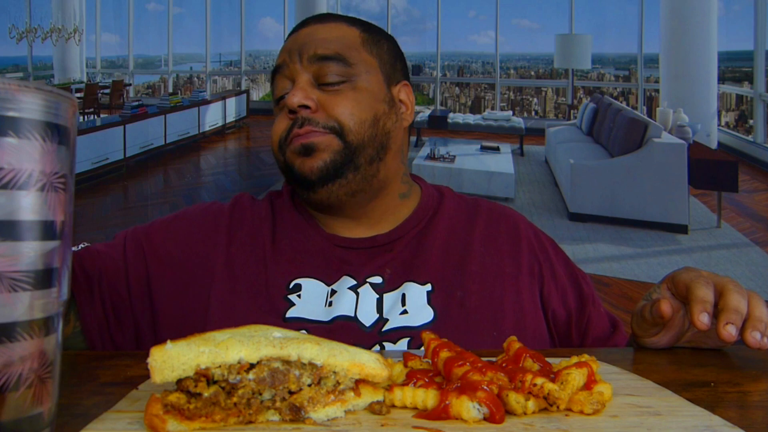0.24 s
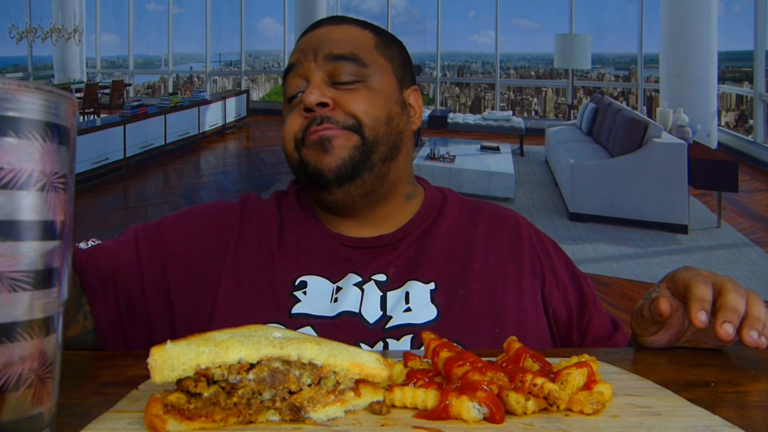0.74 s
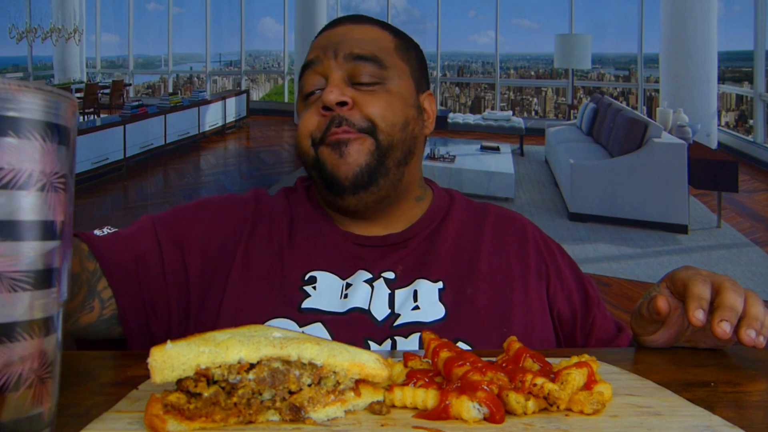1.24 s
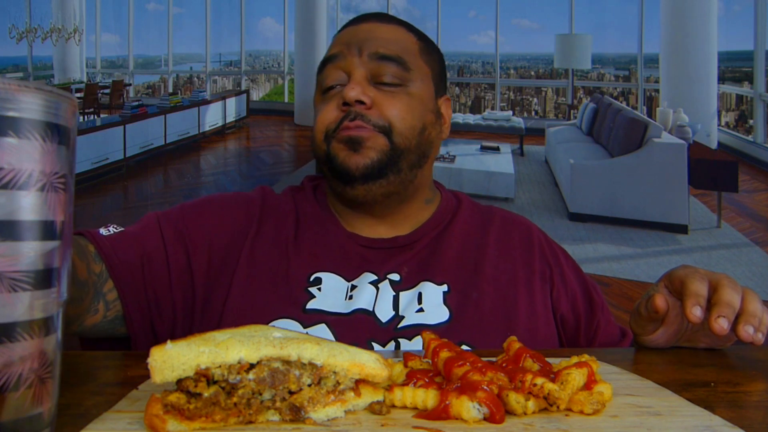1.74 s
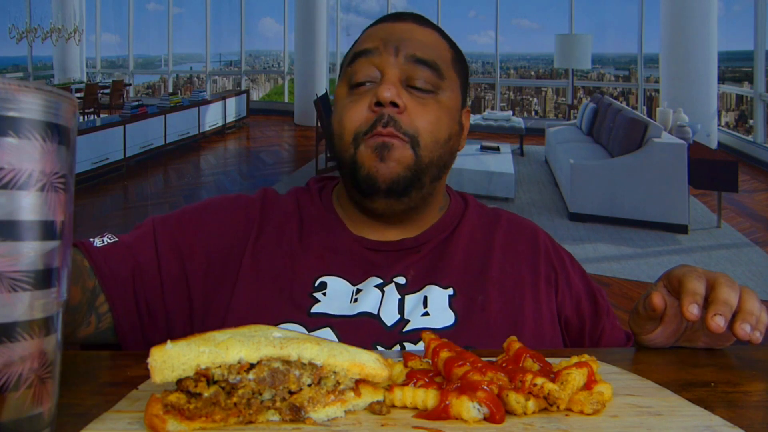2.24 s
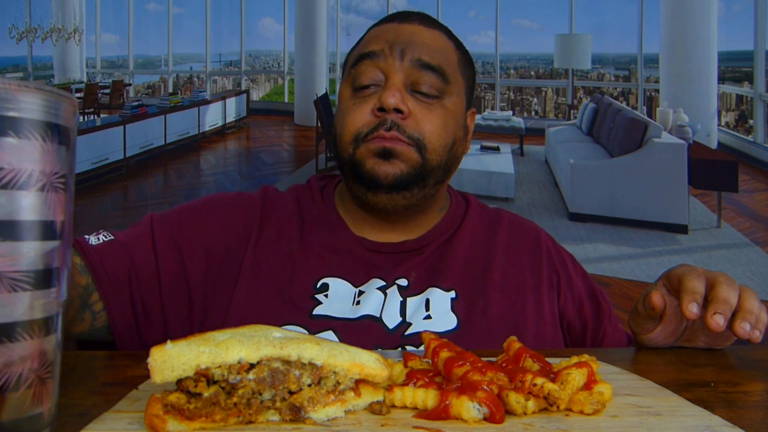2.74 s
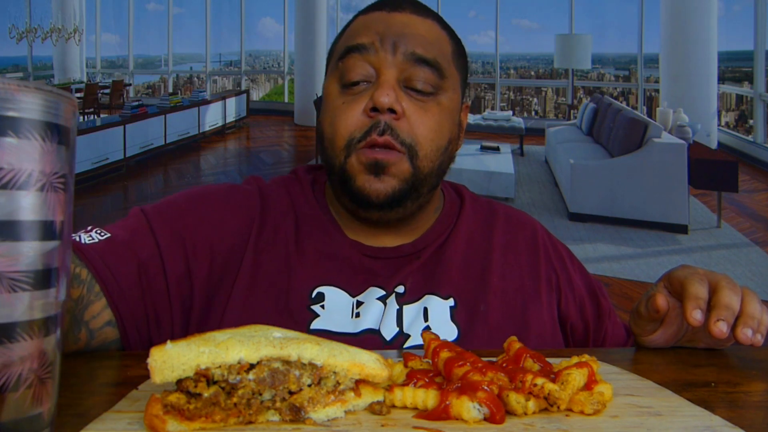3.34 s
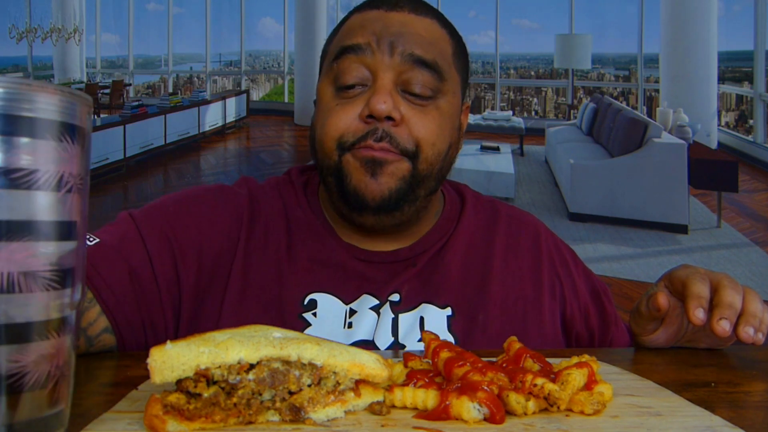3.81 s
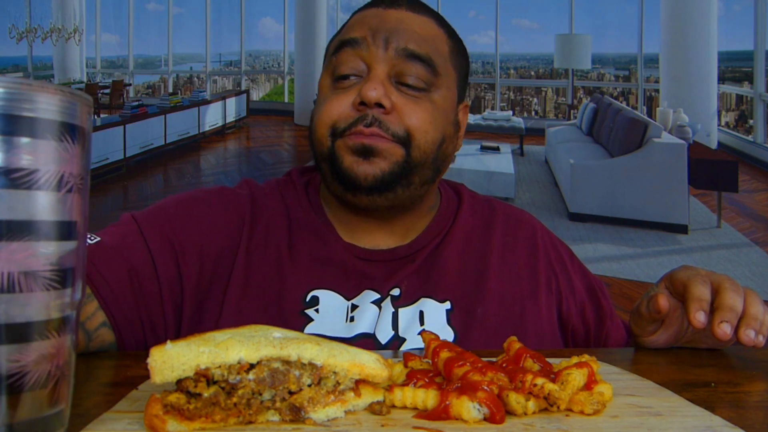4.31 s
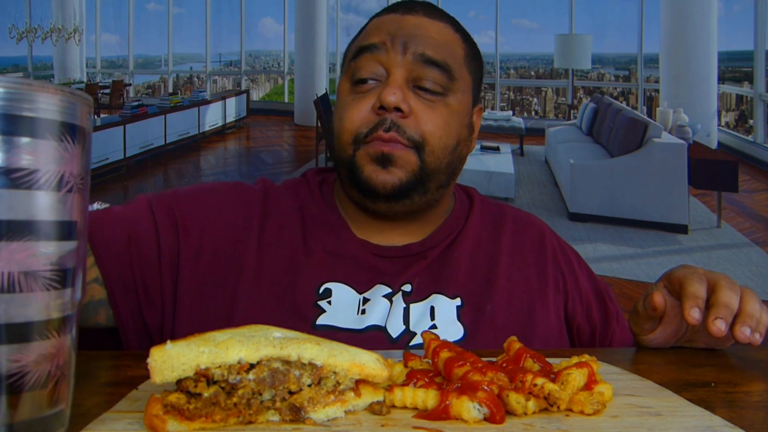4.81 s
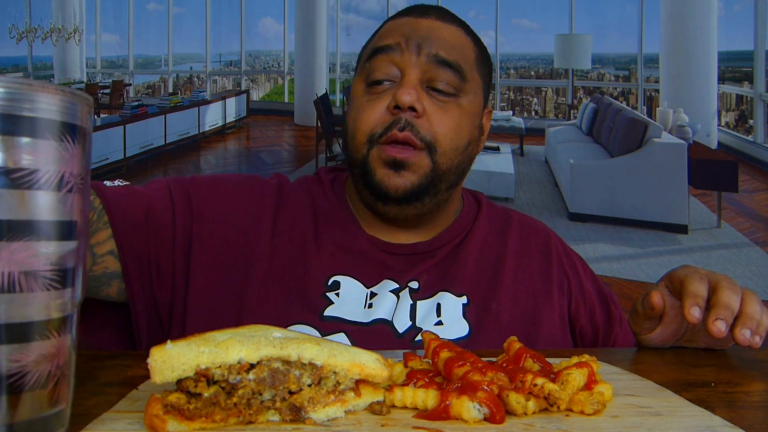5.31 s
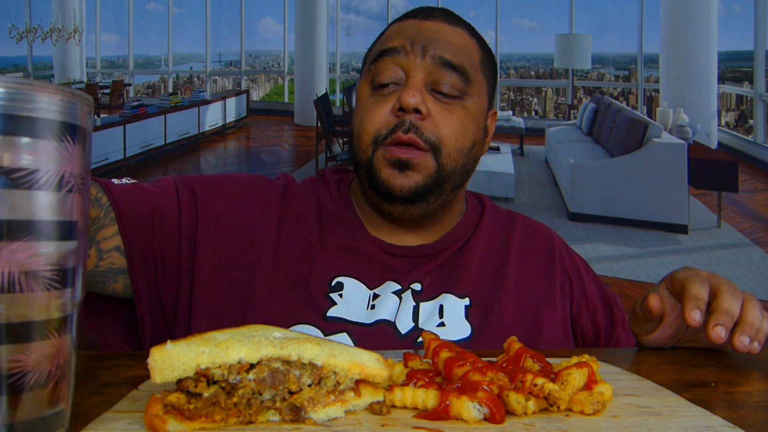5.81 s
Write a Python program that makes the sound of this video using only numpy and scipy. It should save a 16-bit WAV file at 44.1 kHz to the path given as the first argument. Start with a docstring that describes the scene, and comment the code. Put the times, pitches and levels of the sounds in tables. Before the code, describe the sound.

A drink can shuffles lightly on a wooden table. Its tab cracks the seal with a brief spit of gas, and the lid tears open in loud, sharp snaps. After a few smaller clicks, the can is dragged with a squeaky scrape and some knocks. A plastic tumbler is tapped, then soda pours in softly, bubbling and crackling. The sounds are close and slightly left in a small room with a faint hum.

```python
"""A drink can is opened: the tab cracks the seal, gas spits out and the thin lid tears in three snaps.
Before that, the can shuffles on a wooden table, its rim slipping in tiny jerks. Afterwards the tab
clicks back, the can is dragged, a plastic tumbler is nudged and tapped, and soda pours into it, a
cloud of ringing bubbles under crackling foam. A small live room with a faint hum surrounds it all."""
import sys
import numpy as np
from scipy import signal
from scipy.fft import rfft, irfft, next_fast_len
from scipy.io import wavfile
from scipy.ndimage import uniform_filter1d

SR = 44100
rng = np.random.default_rng(int(sys.argv[2]) if len(sys.argv) > 2 else 0)


def waveform_to_disk(signal):
    """Save audio, clipped to [-1, 1], as 16-bit WAV at the path in sys.argv[1]."""
    frames = np.transpose(np.atleast_2d(signal))
    scaled = np.clip(frames, -1, 1) * 32767
    samples = np.round(scaled).astype(np.int16)
    wavfile.write(sys.argv[1], SR, samples)


N = 267246

# Tone curves for the noisy layers. Each row: frequency in Hz, relative spectral level in dB.
AIR_TONE = [(15, -38.5), (25, -12), (48, -20), (119, -15.5), (204, -7), (233, -12), (289, -13.5),
            (445, -15.5), (848, -12), (1900, -25), (3720, -31.5), (4620, -33), (6210, -26), (15500, -40.5)]
FIZZ_TONE = [(1100, -14), (1500, -3), (2290, -6), (3890, -8), (4460, -9.5), (4950, -7), (5780, -10.5),
             (8020, -4), (15000, -29)]
POUR_TONE = [(210, -46.5), (350, -10), (607, -1), (780, -11), (871, -21), (942, -8.5), (1530, -2.5),
             (2270, -6.5), (3640, -14.5), (4130, -9), (5150, -9), (8380, -5), (11000, -13), (15000, -23)]
SHUFFLE_TONE = [(71, -61.5), (120, -30), (170, -24), (230, -9.5), (300, -11.5), (456, -10.5), (493, -8.5),
                (665, -12.5), (812, -6.5), (1000, -13), (1210, -14.5), (1420, -12), (1950, -18),
                (2200, -15.5), (2600, -14.5), (3400, -18.5), (6070, -19.5), (7550, -18), (14000, -46.5)]
SKID_TONE = [(88, -63), (150, -33), (215, -18.5), (387, -9), (426, -7.5), (672, -19.5), (860, -4.5),
             (1230, -9.5), (1310, -5.5), (1520, -30), (1610, -13), (2690, -25), (3130, -21.5),
             (7920, -28.5), (14000, -56)]
DRAG_TONE = [(71, -55), (120, -26), (200, -10.5), (318, -8.5), (400, -5), (530, -3.5), (690, -4),
             (790, -7.5), (952, -7.5), (1480, -6), (1900, -12), (2530, -17.5), (2900, -12), (3400, -19),
             (6310, -17.5), (9780, -31), (11500, -43.5), (14000, -85)]
NUDGE_TONE = [(88, -33.5), (150, -8), (210, -18), (341, -11.5), (524, -1.5), (776, -12), (935, -13),
              (1050, -14.5), (1380, -12), (1900, -23), (6890, -20), (13000, -44)]
GAS_TONE = [(200, -61.5), (700, -41), (1300, -22), (2100, -20.5), (2900, -28), (4100, -11.5), (4700, -3.5),
            (5500, -5.5), (8000, -1.5), (10000, -8.5), (12500, -17), (15000, -25), (16000, -54)]
TEAR_TONE = [(530, -55), (900, -19), (1450, -8), (1860, -5.5), (2300, -12), (2750, -15), (3150, -15),
             (3930, -9.5), (4400, -17), (5690, -2), (6800, -11), (8310, -6), (10600, -28.5), (13000, -35)]
# Appliance hum. Each row: frequency in Hz, relative level in dB.
HUM_PARTIALS = [(118.4, -70.5), (166.9, -76)]
# The room's tail. Each row: frequency in Hz, time to fall 60 dB in seconds.
ROOM_DECAY = [(200, .4), (600, .36), (1300, 0.37), (4000, 0.36), (8000, 0.37), (14000, 0.17)]
# Early reflections. Each row: delay in seconds, relative level in dB.
REFLECTIONS = [(.0053, -14.5), (.0088, -21.5), (0.0106, -15.5)]
# The loudest splashes in the tumbler. Each row: start in seconds, relative level in dB, bubble pitch
# in Hz, decay time in cycles, spray level against the bubble in dB.
SPLASHES = [(5.1367, -42, 4620, 8, -23.5), (5.1554, -42, 6860, 6, -8), (5.3217, -43.5, 2726, 4.5, -4.5),
            (5.4453, -41, 6700, 10, -18), (5.47, -42, 5760, 10, -21), (5.5772, -36, 4370, 16, -18),
            (5.595, -41, 4800, 14, -13), (5.628, -41, 6600, 5, -14), (5.6371, -34, 1950, 6.4, -14),
            (5.6491, -35.5, 2240, 8.7, -7), (5.6883, -39, 5835, 13, -11), (5.699, -39.5, 2740, 7, -16),
            (5.711, -39.5, 2519, 9.8, -20), (5.7533, -42, 4190, 8, -15), (5.7613, -37, 5850, 10, -18),
            (5.7867, -32.5, 4030, 13.5, -14), (5.806, -37.5, 8350, 8, -8), (5.8174, -36, 8020, 14, -6.5),
            (5.853, -46.5, 4048, 18, -15), (5.9135, -44.5, 1970, 8, -8), (5.9848, -35.5, 6200, 12, -13),
            (5.999, -37.5, 6400, 14, -9), (6.014, -43, 1814, 9.5, -4), (6.0362, -34, 4640, 10, -15),
            (6.043, -31.5, 4170, 16, -14)]
# The thin stream sounds a resonance of the vessel. Each row: time in seconds, pitch in Hz, level in dB.
VESSEL_RING = [(5.15, 1630, -78), (5.18, 1610, -69.5), (5.3, 1600, -69.5), (5.45, 1542, -62.5),
               (5.62, 1510, -62), (5.73, 1510, -69), (5.81, 1523, -61), (5.86, 1540, -80)]
# A fingertip rubs the can with a thin whistle. Each row: time in seconds, pitch in Hz, level in dB.
FINGER_RUB = [(.6, 7000, -80), (.67, 7010, -53), (.75, 6750, -57), (.78, 7170, -58.5), (.865, 6780, -54),
              (.915, 6720, -61), (.97, 6640, -53.5), (1.07, 6820, -56), (1.2, 7100, -79.5)]
# Resonances of a container on the table. Each row: frequency in Hz, width in Hz, boost in dB.
BODY_MODES = [(222, 18, 7), (320, 13, 4.5), (500, 45, 3.5), (689, 37, 3.5), (973.6, 16, 9), (1083, 14, 6),
              (1370, 98, 6), (1510, 40, 5), (1624, 14, 7), (2176, 60, 5), (2865, 42, 6), (3200, 36, 5.5),
              (4060, 160, 3)]
# Pushes across the table. Each row: manner, time of top speed, rise and fall in seconds, wall level
# in dB, then table rumble and grit in dB against the wall.
PUSHES = [("shuffle", .01, .05, 0.097, -46.5, -6.5, -5), ("shuffle", 0.16, 0.048, 0.047, -39.5, -6, -1.6),
          ("shuffle", 0.5247, .075, 0.044, -44.5, 1, 0.89),
          ("shuffle", 0.592, 0.051, 0.068, -49.5, 3.6, -3.5), ("shuffle", .77, 0.13, 0.31, -59, 8, 1),
          ("shuffle", 1.13, 0.15, .09, -45.5, 1.5, -4.5), ("shuffle", 1.24, 0.067, 0.036, -51, 1.5, -7),
          ("skid", 2.815, 0.043, 0.065, -38, -2.3, -10.5),
          ("skid", 2.905, 0.046, 0.051, -29.5, -10.5, -6.5), ("drag", 2.988, 0.0089, 0.12, -30, -4, -5.5),
          ("drag", 3.14, 0.09, 0.086, -32, -14, -8.5), ("drag", 3.235, 0.072, 0.076, -31.5, -10, -6),
          ("drag", 3.338, 0.077, 0.13, -36, -1.6, -7), ("nudge", 4.11, 0.097, 0.07, -49.5, 0.45, -6)]
# The rim catches and sings. Each row: start and length in seconds, pitch in Hz, level in dB.
SQUEALS = [(.155, 0.047, 1400, -41.5), (0.44, 0.12, 1380, -48), (.53, 0.17, 498.5, -37),
           (1.971, .05, 1400, -40), (2.19, .22, 950, -60), (2.77, 0.11, 1345, -43),
           (2.791, 0.15, 1008, -37.5), (2.861, 0.098, 1334, -27), (3.015, 0.099, 320, -26.5),
           (3.09, .08, 322, -36.5), (3.113, 0.1, 1620, -31.5), (3.2, 0.1, 1488, -29),
           (3.212, 0.11, 1345, -30.5), (3.24, 0.16, 973, -38), (3.21, 0.06, 7330, -45),
           (3.245, 0.06, 6520, -44)]
# Knocks on the table. Each row: start in seconds, relative thud level in dB, pitch in Hz, shove in dB.
KNOCKS = [(1.5025, -26.5, 700, -35), (1.53, -20, 950, -38), (2.983, -13.5, 260, -70),
          (2.995, -14, 292, -65), (3.01, -12.5, 990, -65), (3.026, -19, 510, -65), (3.043, -15, 315, -65),
          (3.058, -17, 317, -65), (4.442, -26.5, 700, -60), (4.448, -33, 930, -66)]
# The tab is worked and metal tears. Each row: peak time in seconds, low and bright band levels in dB.
TEARS = [(1.35, -30, -33), (1.471, -34, -20), (1.51, -34.5, -22.5), (1.538, -31, -28), (1.76, -50, -70),
         (1.968, -47.5, -56), (2.0, -53, -49.5), (2.159, -54, -46)]
# Modes of the lid. Each row: frequency in Hz, relative level in dB, time to fall 60 dB in seconds.
LID_MODES = [(1030, -8.5, .011), (1400, -9, .018), (1740, -14, 0.0041), (2200, -12, 0.011),
             (3024, -1, .013), (3250, -7, .0052), (4090, -3.5, .0085), (4958, -3.5, .007),
             (5530, -3, .0031), (7330, 7.5, .003), (8150, -5.5, .007), (9300, -9.5, 0.0095)]
# Snaps of lid and tab. Each row: start in seconds, relative level in dB, wall pitch in Hz, low, rim and
# bright bands in dB against the middle band, panel pitch in Hz, panel level in dB, top of ring in Hz.
SNAPS = [(0.4473, -43, 1400, -15, -7, 1, 6900, 6, 12000), (.4795, -37, 1400, -15, -9, 1, 5960, 6, 12000),
         (.5322, -30, 1400, -16, -17, 0, 5700, 20, 8640), (1.279, -4, 1500, -35, -31, -5, 4080, 14, 9500),
         (1.4635, -5, 1950, -14.5, -33, -4.5, 4140, 6, 8900),
         (1.4686, -18, 1900, -20, -20, 0, 5800, 19, 8800),
         (1.5019, 0, 2076, -13, -25, -11.5, 5200, 5, 11500),
         (1.5074, -10, 1600, -23, -18, -8, 5400, 19, 8800),
         (1.5295, -3.5, 1330, -2.5, -5, -3, 5400, 2.5, 11000),
         (1.8163, -16, 1160, 6, -12, -11.5, 4280, 3, 8200), (1.982, -44, 1413, 23.5, -3, 4, 4300, -3, 8500),
         (2.008, -49.5, 1490, 21, 1, 14, 4300, 0, 8000),
         (2.1625, -33.5, 2150, -13, -4, 11, 7460, 10.5, 9830),
         (2.167, -38.5, 2100, -11, -8, 10, 7500, 1, 9800),
         (2.5002, -27.5, 1450, -1.5, -9, 1.5, 4100, 6, 9700),
         (2.5056, -27, 1440, -14, -10, -2, 5960, 14, 11000),
         (2.5089, -32.5, 1450, -10, -6, 3.5, 8600, 0, 12020),
         (4.4345, -40.5, 1400, -6, -7, 5, 4350, 3, 11510)]

CENTRED_BELOW_HZ = 300  # the whole table top radiates the bass
TOP_HZ = 16000


def amp(db):
    """Decibels to gain."""
    return 10 ** (np.asarray(db) / 20)


def unit(x):
    """Scale to rms 1."""
    return x / np.sqrt(np.mean(x ** 2) + 1e-20)


def along(points, hz):
    """Read a curve of (Hz, value) points on a log frequency axis."""
    f, v = np.transpose(points)
    return np.interp(np.log(hz + 1), np.log(f + 1), v)


def filtered(x, response):
    """EQ x with a gain given as a function of frequency."""
    size = next_fast_len(N + 8192)
    return irfft(rfft(x, size) * response(np.fft.rfftfreq(size, 1 / SR)), size)[..., :N]


def coloured(x, tone, lo=0, hi=SR):
    """The part of x between lo and hi Hz, shaped by a tone curve, at rms 1."""
    return unit(filtered(x, lambda hz: amp(along(tone, hz)) * (hz >= lo) * (hz < hi)))


def bandpass(x, lo, hi):
    """Steep causal band-pass."""
    return signal.sosfilt(signal.butter(4, (lo, min(hi, TOP_HZ)), "band", fs=SR, output="sos"), x)


def add(track, s, sound):
    """Mix a short sound in at s seconds."""
    part = track[round(s * SR):][:len(sound)]
    part += sound[:len(part)]


def swell(s, rise_s, fall_s):
    """A lopsided bell of gain: 1 at time s, 10 dB down rise_s before and fall_s after."""
    t = np.arange(N) / SR - s
    return amp(-10 * np.minimum((t / np.where(t < 0, rise_s, fall_s)) ** 2, 20))


def sizes(shape, spread_db):
    """Grain strengths: most are small, a few larger."""
    return amp(spread_db * np.minimum(rng.exponential(size=shape), 4))


def ticks(rate, spread_db):
    """Random impulses, about `rate` a second."""
    return unit(sizes(N, spread_db) * rng.choice([-1, 1], N) * (rng.random(N) < rate / SR))


def bubbles(count, hz, scatter, cycles, spread_db):
    """A cloud of tiny damped rings at scattered pitches."""
    start = rng.integers(0, N, (count, 1))
    pitch = np.clip(hz * np.exp(scatter * rng.standard_normal((count, 1))), 400, 15000)
    k = np.arange(200)
    turns = pitch * k / SR
    rings = sizes((count, 1), spread_db) * np.sin(2 * np.pi * turns) * np.exp(-turns / cycles)
    return unit(np.bincount((start + k).ravel(), rings.ravel(), N)[:N])


def whistle(points, width_hz, ratio=1):
    """A narrow band of hiss that follows (s, Hz, dB) points, transposed by ratio."""
    s, hz, db = np.transpose(points)
    t = np.arange(round((s[-1] - s[0]) * SR)) / SR + s[0]
    flutter = signal.sosfilt(signal.butter(2, width_hz, fs=SR, output="sos"), rng.standard_normal(len(t)))
    phase = 2 * np.pi * ratio * np.cumsum(np.interp(t, s, hz)) / SR
    track = np.zeros(N)
    add(track, s[0], amp(np.interp(t, s, db)) * unit(flutter * np.cos(phase)))
    return track


def background(air_db, hum_db):
    """A wide bed of room air with a faint appliance hum in the centre."""
    noise = rng.standard_normal((3, N))
    hum = sum(amp(db) * np.sqrt(2) * np.sin(2 * np.pi * (hz * np.arange(N) / SR + rng.random()))
              for hz, db in HUM_PARTIALS)
    return amp(air_db) * coloured(noise[:2] + 0.53 * noise[2], AIR_TONE) + amp(hum_db) * hum


def room(x, wet_db, pan_db):
    """Direct sound, near walls and a diffuse tail, at constant energy; positive pan leans left."""
    hz, t, noise = signal.stft(rng.standard_normal((3, SR // 2)), SR, nperseg=256)
    shared_db = along([(150, 6), (300, -1.5), (4000, 1), (8000, -8)], hz)
    noise[2] *= amp(shared_db)[:, None]  # long waves reach both sides alike
    tails = signal.istft(noise * amp(-60 * t / along(ROOM_DECAY, hz)[:, None]), SR, nperseg=256)[1]
    fade_in = 1 - np.exp(-(np.arange(tails.shape[1]) / SR / 0.0028) ** 2)
    response = (tails[:2] + tails[2]) * fade_in
    response *= amp(wet_db) / np.linalg.norm(response[0])
    pan = amp([[pan_db / 2], [-pan_db / 2]])
    direct = signal.unit_impulse(response.shape[1])
    bass = signal.lfilter(*signal.butter(1, CENTRED_BELOW_HZ, fs=SR), direct)
    response += pan * (direct - bass) + pan.mean() * bass
    for delay, db in REFLECTIONS:
        response[:, round(delay * SR)] += amp(db)
    response /= np.sqrt(np.sum(response ** 2) / 2)
    return signal.fftconvolve(x[None], response, axes=1)[:, :N]


def fizz(start_s, level_db, fade_db_per_s, mist_db):
    """Small bubbles burst inside the open can over a fine mist of hiss, ever more faintly."""
    bursts = bubbles(count=6000, hz=5400, scatter=0.25, cycles=4, spread_db=0.5)
    mist = amp(mist_db) * rng.standard_normal(N)
    age = np.arange(N) / SR - start_s
    return (age > 0) * amp(level_db - fade_db_per_s * age) * coloured(bursts + mist, FIZZ_TONE, lo=900)


def pour(stream_db, foam_db, clump_db):
    """The stream traps larger bubbles while foam crackles above it in little flurries."""
    stream = swell(5.58, rise_s=0.24, fall_s=0.25)  # swells, then foam muffles it
    foam = swell(5.814, rise_s=0.46, fall_s=1)  # the head builds later and lingers
    large = bubbles(count=2500, hz=1490, scatter=0.538, cycles=7, spread_db=0.5)
    small = bubbles(count=7000, hz=5200, scatter=0.26, cycles=4.5, spread_db=2)
    gurgle, crackle = coloured(large, POUR_TONE, hi=4200), coloured(small, POUR_TONE, lo=2500)
    flurries = amp(clump_db * unit(uniform_filter1d(rng.standard_normal(N), size=500)))
    return amp(stream_db) * stream * gurgle + amp(foam_db) * foam * unit(flurries * crackle)


def splashes(chirp, gain_db, spray_t60, attack_s):
    """Each splash rings one bubble with a rising pitch and throws a short spray of crackles."""
    track, t = np.zeros(N), np.arange(SR // 10) / SR
    crackle = coloured(ticks(rate=1600, spread_db=2.2), POUR_TONE, lo=1500)
    for s, db, hz, cycles, spray_db in SPLASHES:
        envelope = np.exp(-hz * t / cycles) * (1 - np.exp(-t / attack_s))
        ring = envelope * np.sin(2 * np.pi * hz * t * (1 + chirp * t))
        grains = unit(crackle[rng.integers(N - len(t)):][:len(t)])
        spray = amp(spray_db - 60 * t / spray_t60) * grains
        add(track, s, amp(db + gain_db) * (ring + spray))
    return bandpass(track, 1450, 12500)


def vessel(upper_ratio, upper_db):
    """The stream sounds two narrow resonances of the vessel, which glide together."""
    lower = whistle(VESSEL_RING, width_hz=42)
    return lower + amp(upper_db) * whistle(VESSEL_RING, width_hz=75, ratio=upper_ratio)


def judder(depth_db):
    """Grip comes and goes many times a second."""
    return amp(depth_db * unit(bandpass(rng.standard_normal(N), 15.3, 72)))


def body(f):
    """The container's response at f Hz: one resonant peak for each mode."""
    return 1 + sum((amp(db) - 1) * 1j * f * width / (hz * hz - f * f + 1j * f * width)
                   for hz, width, db in BODY_MODES)


def slide(manner, tone, slips):
    """Tiny slips of the rim shake the table, ring the wall and scratch, swelling with each push."""
    shaken = filtered(slips, body)
    table, wall, grit = [coloured(shaken, tone, lo, hi) for lo, hi in [(0, 700), (700, 2500), (2500, SR)]]
    return sum(amp(db) * swell(s, rise_s, fall_s) * (wall + amp(table_db) * table + amp(grit_db) * grit)
               for kind, s, rise_s, fall_s, db, table_db, grit_db in PUSHES if kind == manner)


def squeals(drift_hz):
    """The slips lock briefly onto one resonance and sing a wavering note."""
    track = np.zeros(N)
    for s, length, hz, db in SQUEALS:
        grip = signal.windows.tukey(round(length * SR), 0.7)
        drift = drift_hz * unit(uniform_filter1d(rng.standard_normal(SR), size=120))[:len(grip)]
        add(track, s, amp(db) * grip * np.sin(2 * np.pi * np.cumsum(hz + drift) / SR))
    return track


def knocks(t60, thud_db, shove_s):
    """Short dead thuds of the table top, each over one low shove."""
    thuds, shoves, t = np.zeros(N), np.zeros(N), np.arange(SR // 10) / SR
    for s, db, hz, shove_db in KNOCKS:
        noise = unit(bandpass(rng.standard_normal(len(t)), 200, 950))
        add(thuds, s, amp(db + thud_db - 60 * t / t60) * (np.sin(2 * np.pi * hz * t) + 0.6 * noise))
        add(shoves, s, amp(shove_db) * (1 - t / shove_s) * np.exp(-t / shove_s))
    return bandpass(thuds, 175, 2500) + bandpass(shoves, 30, 300)


def gas(peak_s, rise_s, fall_s, level_db):
    """Pressure spits out in one bright hiss that swells to its peak at peak_s and is spent at once."""
    after_first_tick = np.arange(N) / SR > SNAPS[0][0]
    jet = coloured(rng.standard_normal(N), GAS_TONE)
    return after_first_tick * amp(level_db) * swell(peak_s, rise_s, fall_s) * jet


def tear(rise_s, fall_s):
    """Aluminium gives way in runs of tiny fractures that start sharply and die out."""
    fractures = ticks(rate=2200, spread_db=0.5)
    low, bright = coloured(fractures, TEAR_TONE, hi=3600), coloured(fractures, TEAR_TONE, lo=5000)
    return sum(swell(s, rise_s, fall_s) * (amp(low_db) * low + amp(bright_db) * bright)
               for s, low_db, bright_db in TEARS)


def lid(crack_db, panel_cycles, wall_db, wall_t60, gain_db, attack_s, edge_db):
    """Each snap rings the same lid; where it buckles sets panel and wall pitch and the band balance."""
    track, t = np.zeros(N), np.arange(SR // 20) / SR
    attack = 1 - np.exp(-t / attack_s)  # the thin sheet takes a moment to buckle
    for s, db, wall_hz, low_db, rim_db, bright_db, panel_hz, panel_db, top_hz in SNAPS:
        modes = [*LID_MODES, (panel_hz, panel_db, panel_cycles / panel_hz), (wall_hz, wall_db, wall_t60)]
        ring = sum(amp(level + rng.normal(0, 1) - 60 * t / t60)
                   * np.sin(2 * np.pi * (hz * t + rng.random())) for hz, level, t60 in modes)
        crack = amp(crack_db - 60 * t / 0.011) * rng.standard_normal(len(t))
        hit = (ring + crack) * attack
        bands_hz = [(950, 2300), (2300, 3250), (3400, 6200), (6400, top_hz)]
        low, rim, middle, bright = [unit(bandpass(hit, lo, hi)) for lo, hi in bands_hz]
        edge = amp(edge_db) * unit(bandpass(crack, 9000, TOP_HZ))
        snap = middle + amp(low_db) * low + amp(rim_db) * rim + amp(bright_db) * bright + edge
        add(track, s, amp(db + gain_db) * snap / np.abs(middle).max())
    return track


def scene():
    """The stereo mix: can and tumbler stand a little to the left in the room."""
    snaps = lid(crack_db=4.5, panel_cycles=22, wall_db=-1, wall_t60=0.014,
                gain_db=2, attack_s=0.00027, edge_db=-23.5)
    thuds = knocks(t60=0.027, thud_db=-4.5, shove_s=0.002)
    mix = room(snaps + thuds, wet_db=-3.5, pan_db=7.5)

    spit = gas(peak_s=1.292, rise_s=0.0088, fall_s=0.046, level_db=-14.5)
    mix += room(spit + tear(rise_s=0.0056, fall_s=0.025), wet_db=-1, pan_db=1.5)

    shuffle = slide("shuffle", SHUFFLE_TONE, ticks(rate=5000, spread_db=3))
    mix += room(shuffle + whistle(FINGER_RUB, width_hz=430), wet_db=-0.5, pan_db=1.3)

    skid = slide("skid", SKID_TONE, ticks(rate=3000, spread_db=0.5))
    drag = slide("drag", DRAG_TONE, ticks(rate=1800, spread_db=1.5) * judder(depth_db=3))
    nudge = slide("nudge", NUDGE_TONE, ticks(rate=3100, spread_db=2.5))
    sliding = bandpass(skid + drag + nudge, 147, 12000)  # the table radiates little deep bass
    mix += room(sliding, wet_db=-3, pan_db=7)

    soda = fizz(start_s=1.7, level_db=-53, fade_db_per_s=6.5, mist_db=1.5)
    soda += pour(stream_db=-58, foam_db=-54.5, clump_db=3)
    soda += splashes(chirp=0.8, gain_db=1, spray_t60=0.048, attack_s=0.0002)
    soda += vessel(upper_ratio=1.89, upper_db=-5)
    mix += squeals(drift_hz=30.7) * amp([[0.7], [-0.7]])  # dry, just left of centre
    mix += room(soda, wet_db=-2.5, pan_db=1.5)
    return mix + background(air_db=-59.5, hum_db=-6.5)


def record(dry):
    """The loudest snaps clip, the very top is cut away, and the signal sits slightly off zero."""
    return filtered(np.clip(dry, -1, 1), lambda hz: hz < TOP_HZ) - 0.0026


dry = scene()
out = record(dry)
waveform_to_disk(out)
```